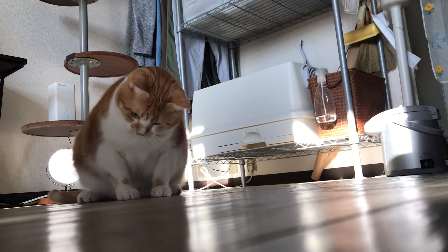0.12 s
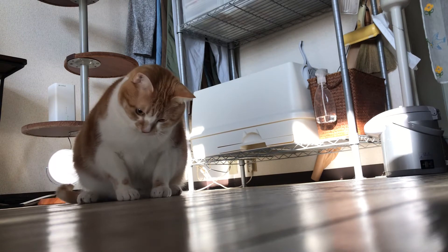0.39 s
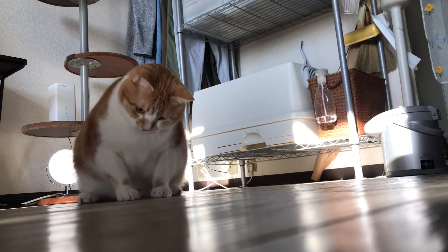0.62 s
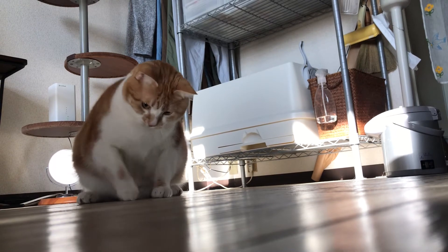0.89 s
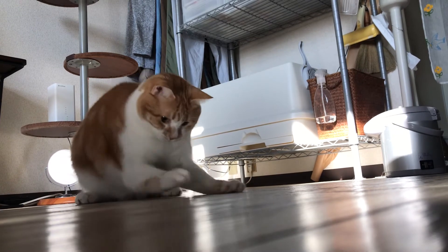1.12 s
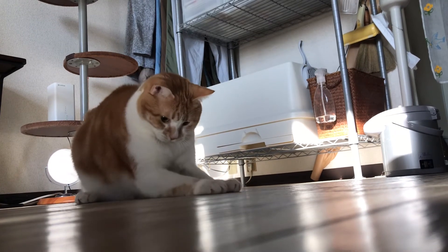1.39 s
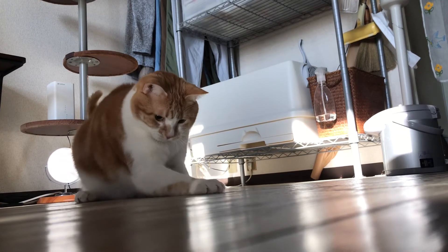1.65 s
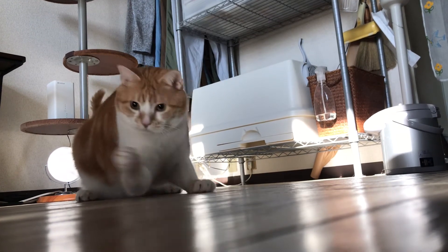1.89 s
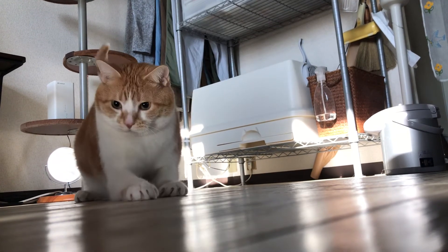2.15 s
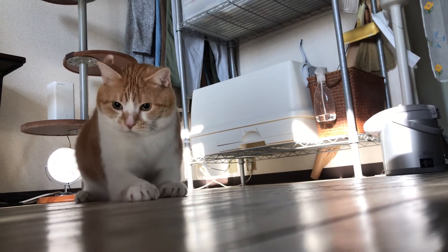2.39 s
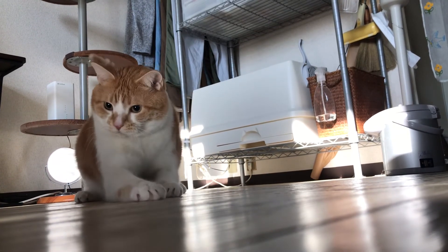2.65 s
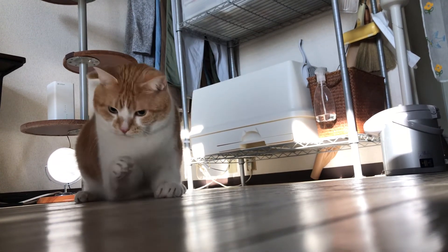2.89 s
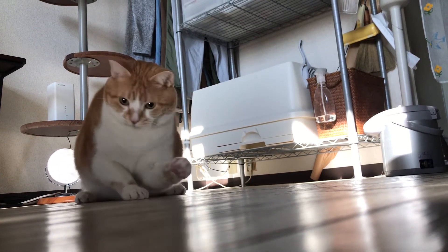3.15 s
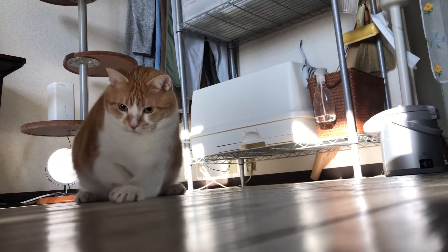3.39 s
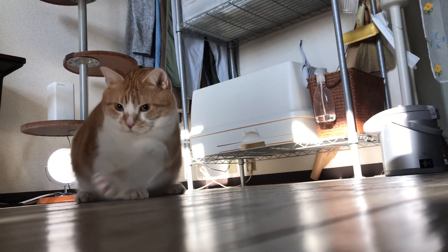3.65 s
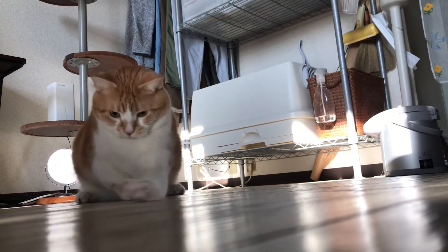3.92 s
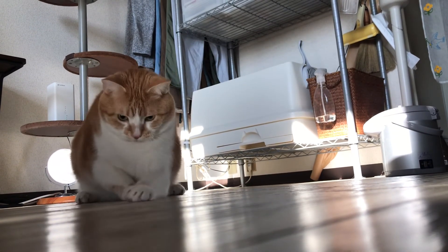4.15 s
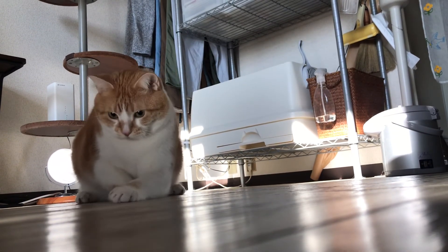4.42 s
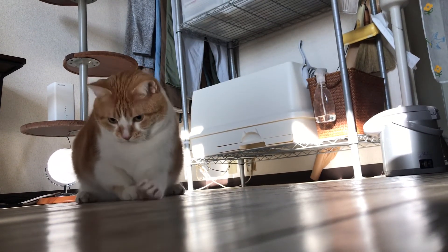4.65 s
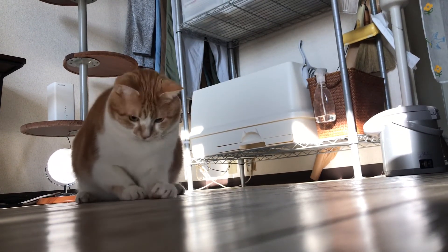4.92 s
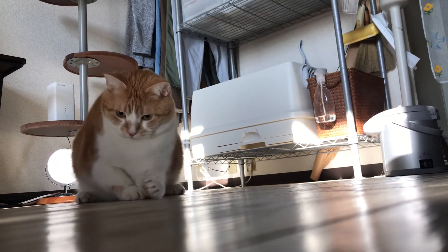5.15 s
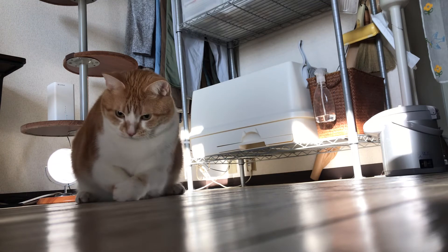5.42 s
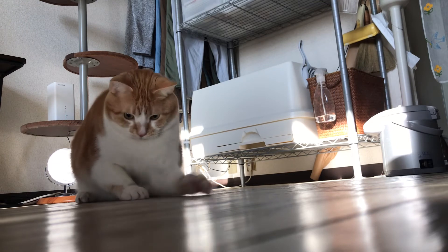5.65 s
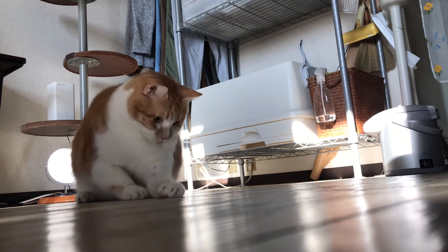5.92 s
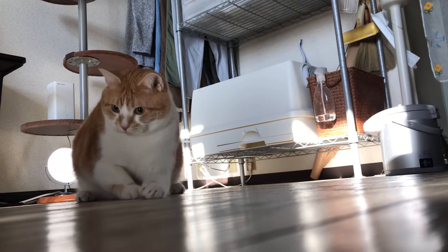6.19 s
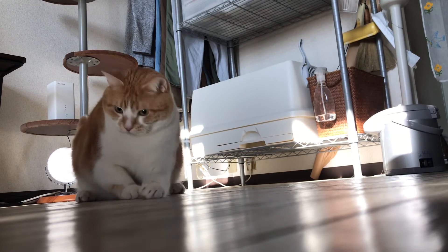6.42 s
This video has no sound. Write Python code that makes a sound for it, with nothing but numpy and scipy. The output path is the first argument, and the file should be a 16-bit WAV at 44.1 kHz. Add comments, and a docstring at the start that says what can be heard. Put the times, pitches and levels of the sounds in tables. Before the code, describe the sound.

A microphone on the floorboards of a small furnished room picks up a cat's paws. At first there is only low muffled traffic, wavering deep hum and faint hiss, with a tiny wet throat pop and fluttering purr breath near 0.45 s. A slight scuff at 0.8 s leads to a cluster of soft, dull thumps with claw ticks at 1.0-1.15 s. Stronger hollow knocks follow at 1.57, 1.99 and 2.56 s, the last sharp and clicky with a boomy ring. Faint purring with small pops comes around 2.2 and 2.9 s, and weak pats near 3.0 and 3.25 s. A solid thump with a claw click and scuff lands at 3.9 s. Quiet purring runs 4.25-4.85 s, ending with a barely audible pat. A softer thud comes at 5.65 s, then a last faint purr from 5.8 s and a throat pop with a brief low swell near 6.27 s, as hum and rumble rise slightly until 6.5 s.

```python
"""Cat pouncing on a wooden floor

A cat pats and pounces on floorboards, the microphone lying on the same boards. Each paw excites
a bending pulse and the ringing low modes; claws tick in short resonant bursts and pads scuff by friction.
The cat purrs on its breaths, airflow noise chopped into puffs, and wet pops come from its throat.
Traffic noise and wavering hums come through the walls, with a faint whine and microphone hiss."""
import sys
import numpy as np
from scipy import signal
from scipy.fft import rfft, irfft
from scipy.io import wavfile
from scipy.ndimage import uniform_filter1d

SR = 44100
rng = np.random.default_rng(int(sys.argv[2]) if len(sys.argv) > 2 else 0)


def how_loud(loudness_db):
    """Turn decibels into a plain amplitude multiplier (0 dB gives 1, 20 dB gives 10)."""
    steps = np.asarray(loudness_db, float) / 20
    return 10 ** steps


def persist_wave(psi):
    """Save psi, clipped to +-1, as 16-bit WAV."""
    counts = np.round(np.clip(psi, -1, 1) * 32767).astype(np.int16)
    wavfile.write(sys.argv[1], SR, np.atleast_2d(counts).T)


N = 288783

# paw blows: start_s, peak_db (before the joist filter), contact_ms, tuning_factor, ring_db (re first pulse)
PAW_BLOWS = [(0.994, -32, 5.3, 1.08, 11), (1.094, -29, 7.6, 1.2, -6.5), (1.151, -23.5, 5.8, 1., -1.5),
             (1.5699, -15, 3.23, 0.98, -2.5), (1.6403, -27.5, 1.7, 0.94, -5.5),
             (1.9854, -13.5, 1.4, 0.88, -7), (2.519, -34, 0.59, 1.88, -12), (2.561, -13.5, 0.4, 1.013, -6),
             (2.578, -27, 1.4, 1.002, 23), (3.003, -36.5, 20, 0.89, 15), (3.245, -45, 0.93, 1.05, -3),
             (3.9206, -19, 3.1, 0.92, -1.5), (4.834, -46.5, 0.89, 1.34, -10),
             (5.669, -24.5, 6.6, 0.95, -3.5)]
# modes of the floorboards: mode_hz, level_db, t60_s (before the cat's weight damps them)
BOARD_MODES = [(63.45, -48, 0.46), (69.85, -5.5, 0.36), (81.7, -7, 0.63), (102.9, -8.5, 0.23),
               (118.1, -17.5, 0.6), (140.7, -15, 0.55), (193.3, -23, 0.73), (234.8, -16, 0.42),
               (290, -8.5, 0.077), (321, -28.5, 0.39), (401.6, -16.5, 0.15), (477, -30.5, 0.34),
               (518, -47, 0.3), (707.7, -26, 0.088)]
# claw ticks: start_s, peak_db, centre_hz, width_share (of the centre, each resonance pass)
CLAW_TICKS = [(0.8374, -52.5, 2530, 1.1), (0.9187, -48, 2960, 0.36), (0.9839, -33, 2680, 0.7),
              (1.0812, -32, 3100, 2.1), (1.1495, -30, 2160, 0.87), (1.1608, -27.5, 2850, 0.45),
              (1.5662, -34, 2540, 0.69), (1.5722, -31.5, 2900, 1.6), (1.7523, -48.5, 7000, 2.3),
              (1.8018, -53, 2980, 1.2), (1.8807, -49, 1970, 1.8), (1.982, -37, 2800, 0.76),
              (1.9935, -24.5, 3070, 0.46), (2.0697, -43, 2400, 1), (2.556, -23, 2400, 1.33),
              (2.5678, -35, 2140, 0.65), (2.577, -31.5, 3690, 1.1), (3.242, -44.5, 3930, 0.43),
              (3.3244, -51, 2900, 0.76), (3.679, -46.5, 3000, 1.3), (3.9087, -24, 2500, 1.9),
              (3.9402, -37, 3200, 3.2), (4.8379, -48.5, 2260, 0.46), (5.6434, -45, 2705, 1.2),
              (5.6487, -29.5, 2460, 1.25), (5.6598, -48, 3200, 0.94)]
# pads sliding on the varnish: start_s, held_rms_db, slide_s, fade_t60_s, tilt_db_per_octave
PAD_SLIDES = [(0.828, -61.5, 0.011, 0.041, -8), (.992, -52.5, 0.033, 0.03, 1.5),
              (1.091, -56.5, 0.037, 0.065, 1), (1.14, -45.5, 0.037, 0.13, 4), (1.570, -40, 0.01, 0.025, -6),
              (1.63, -52, 0.0096, 0.03, -6), (1.794, -64.5, 0.029, .05, -4), (1.88, -52.5, 0.027, 0.09, -8),
              (1.993, -38.5, 0.028, 0.078, 2), (2.061, -66, 0.061, 0.035, 5),
              (2.5174, -53.5, 0.0042, 0.2, -5), (2.557, -50, 0.0025, 0.056, -1),
              (2.574, -50, 0.006, 0.035, 2.5), (2.67, -66, 0.0145, 0.024, -2.5),
              (2.70, -66, 0.015, .03, -5), (3.239, -52, 0.022, 0.1, -0.5), (3.384, -58.5, 0.043, 0.09, 2.5),
              (3.557, -69, 0.028, .05, -2), (3.691, -54, 0.013, 0.071, 3), (3.909, -51, 0.03, 0.091, -0.5),
              (4.07, -69, 0.017, 0.036, 0), (4.837, -62.5, 0.03, 0.096, -0.5), (5.25, -63, .034, 0.22, 3.5),
              (5.648, -49, 0.012, 0.12, -2)]
# friction spectrum before the tilt: frequency_hz, density_db (per Hz, relative)
FRICTION_SPECTRUM = [(290, -45.5), (600, -11.5), (1300, -10.5), (2500, -2), (3700, -3.5), (4800, -19.5),
                     (5630, -8.5), (7640, -23.5), (10400, -30.5), (14000, -25), (16000, -35)]
# purring breaths: first_puff_s, end_s, level_db, change_db (by the end), throb_share
PURR_BREATHS = [(.446, 0.687, -68.5, -2.5, 0.84), (1.486, 1.57, -75.5, 20, 0.26),
                (2.173, 2.47, -65.5, -1, 0.75), (2.913, 3.133, -61.5, -6.5, 0.36),
                (4.246, 4.84, -65, -5, 0.67), (5.8, 6.17, -71, 2, 0.3)]
# airway resonances: centre_hz, width_hz, level_db
NOSE_MODES = [(1118, 270, -1), (2820, 670, -6), (3510, 700, 0), (3830, 94, -17)]
# hiss of fast air in the nostrils: centre_hz, width_hz, level_db
NOSTRIL_MODES = [(5960, 610, -5.5), (6900, 1920, -11), (8520, 1400, -14)]
# wet pops in the cat's throat: start_s, peak_db, centre_hz
THROAT_POPS = [(0.435, -52, 1140), (0.466, -55, 1230), (1.461, -53.5, 1100), (2.163, -56, 1050),
               (2.298, -46, 1070), (2.398, -52, 972), (2.899, -49.5, 1134), (2.953, -48, 1220),
               (3.014, -55, 1200), (3.084, -53, 1140), (3.744, -50, 870), (6.26, -48.5, 756)]
# traffic beyond the wall: time_s, rumble_db (before drift), roar_rms_db (tyres, near 1 kHz)
TRAFFIC_LEVELS = [(0, -60, -82), (.8, -59, -74), (1.4, -58, -76), (2.3, -56, -72.5), (3, -59, -76.5),
                  (4, -60, -79.5), (4.5, -56, -67.5), (5.2, -62, -70), (5.6, -56, -71), (6.001, -56, -66),
                  (6.3, -52, -72.5), (6.55, -54.5, -65)]
# rumble spectrum: frequency_hz, density_db (per Hz, relative)
RUMBLE_SPECTRUM = [(20, -28), (40, -12.5), (70, -3), (150, -4), (250, -11), (350, -15), (480, -24.5),
                   (700, -52), (1000, -89)]
# one brief soft low swell: rms_db (at its height), centre_hz, width_hz
LOW_SWELL = (-51.5, 246, 340)
# low hum: time_s, pitch_hz, rms_db
LOW_HUM_TRACK = [(0, 48, -54.5), (.6, 46.9, -59.5), (.75, 53.8, -55.5), (1.4, 57, -57.5), (2.7, 58, -53),
                 (3.8, 51.2, -56), (4.3, 53.08, -53.5), (4.7, 54, -50.5), (5.1, 54.8, -48.5),
                 (5.6, 55.5, -54.5), (5.8, 56.8, -47.5), (6.55, 57.3, -47.5)]
# a higher hum that comes twice: time_s, pitch_hz, rms_db
HIGH_HUM_TRACK = [(2.9, 148, -76), (3.2, 148, -60), (3.8, 147.5, -55), (3.9, 146, -88), (5.8, 148.2, -68.5),
                  (6.05, 148.6, -67.5), (6.3, 147.5, -52), (6.55, 146, -55)]
# faint high whine: time_s, pitch_hz, rms_db
WHINE_TRACK = [(0, 12700, -91), (4.3, 13100, -87), (4.7, 13000, -104), (6.55, 13000, -90)]
# microphone hiss: frequency_hz, density_db (per Hz, relative)
HISS_SPECTRUM = [(290, -10), (500, -3.5), (709, -3), (1230, -1), (1650, -5.5), (3890, -9.5), (4770, -15),
                 (5850, -13.5), (9180, -16.5), (10500, -20), (13000, -15.5), (15300, -18.5), (16200, -28.5)]

DAMPING = 0.71  # the cat's weight shortens the ring of the boards to this share
TRAVEL_MS = 8.52  # delay of a 71 Hz mode; lower modes arrive later
RISE_SHARE = 0.16  # the pad presses down over this share of the slide
PUFFS_PER_S, NOSTRIL_DB = 29.8, 1  # nostril level at the start of a breath
SWELL_S, SWELL_HALF_S = 6.27, 0.065  # centre, and distance from it to 1/e of the height
CLEAR_DB, SMEAR_PER_DB = -48, 0.13  # a hum is pure from this level up; noise share gained per dB below
HISS_DB = -69


def evened(x):
    """Normalisation: scales a signal to rms 1."""
    return x / np.sqrt(np.mean(x ** 2) + 1e-20)


def add(mix, s, sound):
    """Superposition: adds a sound into the mix at s seconds."""
    part = mix[round(s * SR):][:len(sound)]
    part += sound[:len(part)]


def coloured(points, tilt_db=0., size=N):
    """Spectral shaping: white noise weighted by a spectrum, tilted about 3 kHz in dB an octave."""
    hz = np.fft.rfftfreq(size, 1 / SR) + 1
    f, db = np.transpose(points)
    shape_db = np.interp(np.log(hz), np.log(f), db) + tilt_db * np.log2(hz / 3000)
    white = rng.standard_normal(size)
    return evened(irfft(rfft(white) * how_loud(shape_db), size))


def resonate(x, hz, width):
    """Resonance: heterodynes to zero, smooths and shifts back, with gain 1 on a fixed or moving pitch."""
    turn = np.exp(2j * np.pi * np.cumsum(hz * np.ones(len(x))) / SR)
    r = np.exp(-np.pi * width / SR)
    return 2 * (turn * signal.lfilter([1 - r], [1, -r], x / turn)).real


def resonate_twice(x, hz, width):
    """Cascaded resonance: a second pass steepens the skirts of the first."""
    return resonate(resonate(x, hz, width), hz, width)


def noise_band(hz, width):
    """Band noise: white noise through a cascaded resonance, at rms 1."""
    return evened(resonate_twice(rng.standard_normal(N), hz, width))


def slow(rate):
    """Random modulation: noise averaged twice over 1/rate seconds drifts slowly, at rms 1."""
    size = max(int(SR / rate), 1)
    return evened(uniform_filter1d(uniform_filter1d(rng.standard_normal(N), size), size))


def clicks(rows, burst_s, lag_s, snap_db):
    """Impulsive excitation: a burst of a few ms rings one resonance, opened by a thin treble snap."""
    out, t = np.zeros(N), np.arange(1200) / SR
    # dispersion: low notes trail, by lag_s at 1 kHz
    spread = np.exp(-4j * np.pi * lag_s * np.sqrt(1000 * np.fft.rfftfreq(len(t), 1 / SR)))
    for s, db, hz, share in rows:
        decay = how_loud(-60 * t / burst_s)
        burst = rng.standard_normal(len(t)) * decay
        width = np.clip(share, 0.05, 3) * hz
        click = irfft(rfft(resonate_twice(burst, hz, width)) * spread, len(t))
        snap = np.diff(burst * decay, 2)
        add(out, s, how_loud(db) * click / abs(click).max())
        snap_peak = how_loud(db + snap_db) * share ** 2  # wider clicks snap harder
        add(out, s, snap_peak * snap / abs(snap).max())
    return out


def thumps():
    """Modal excitation: a dispersed bending pulse leaves the board modes ringing; longer contact is duller."""
    out, t = np.zeros(N), np.arange(SR // 2) / SR
    for s, db, contact_ms, tuning, ring_db in PAW_BLOWS:
        near = (t - 0.00446 / tuning) * tuning
        chirp = np.cos(2 * np.pi * (185 - 4000 * near) * near)  # treble arrives first
        wave = -np.exp(-(near / 0.0036) ** 2) * chirp
        for hz, mode_db, t60 in BOARD_MODES:
            late = np.maximum(t - TRAVEL_MS / 1000 * np.sqrt(71 / hz), 0)
            ring = how_loud(ring_db + mode_db - 60 * late / (t60 * DAMPING))
            wave += ring * np.sin(2 * np.pi * hz * tuning * late)
        dense = evened(resonate(rng.standard_normal(len(t)), 280, 490))  # many small modes of the planks
        wave += how_loud(-32.5 - 60 * t / 0.27) * np.minimum(t / 0.0019, 1) * dense
        push = np.hanning(max(round(contact_ms * SR / 1000), 3))
        blow = signal.fftconvolve(wave, push)
        add(out, s, how_loud(db) * blow / abs(blow).max())
    joists = signal.butter(6, 56, "high", fs=SR, output="sos")  # stiff joists hold the lowest motion
    return signal.sosfilt(joists, out)


def claw_ticks():
    """Dispersive propagation: claw bursts on the varnish cross the boards, their low notes trailing."""
    return clicks(CLAW_TICKS, burst_s=0.011, lag_s=0.0014, snap_db=-29)


def scuffs():
    """Friction noise: swells, holds while the pad slides, and fades; the grip stutters in clumps of grains."""
    out, t = np.zeros(N), np.arange(16384) / SR
    for s, db, slide, t60, tilt_db in PAD_SLIDES:
        rise = np.minimum(t / (RISE_SHARE * slide), 1)
        fade = how_loud(-60 * np.maximum(t - slide, 0) / t60)
        add(out, s, how_loud(db) * rise * fade * coloured(FRICTION_SPECTRUM, tilt_db, size=len(t)))
    grip = how_loud(3.1 * slow(1200) + 2.1 * slow(330))
    return out * evened(grip)


def airway(air, modes):
    """Formant filtering: turbulent air excites parallel airway resonances whose levels flicker."""
    out = np.zeros(N)
    for hz, width, db in modes:
        # two passes of 1.5 widths leave about one width
        out += how_loud(db + 2.2 * slow(53)) * resonate_twice(air, hz, 1.5 * width)
    return out


def purr():
    """Modulated turbulence: airflow noise is chopped each time the larynx shuts; hiss dies as breath slows."""
    air, t, out = rng.standard_normal(N), np.arange(N) / SR, np.zeros(N)
    nose, nostrils = airway(air, NOSE_MODES), airway(air, NOSTRIL_MODES)
    uneven = 0.035 * slow(25)  # in puff cycles
    for s, end, db, change_db, share in PURR_BREATHS:
        done = np.clip((t - s) / (end - s), 0, 1)
        cycle = PUFFS_PER_S * (t - s) + uneven
        puffs = (0.5 + 0.5 * np.cos(2 * np.pi * cycle)) ** 1.9
        edges = np.clip(np.minimum((t - s + 0.014) / 0.0084, (end - t) / 0.059), 0, 1)
        flow = how_loud(db + change_db * done) * edges * (1 - share + 2 * share * puffs)
        out += flow * (nose + how_loud(NOSTRIL_DB - 9.8 * done) * nostrils)
    return out / nose.std() * how_loud(1.2 * slow(70))


def throat_pops():
    """Damped resonance: each wet pop in the throat is a short burst around one pitch, without dispersion."""
    rows = [(*pop, 0.33) for pop in THROAT_POPS]  # width as a share of the centre
    return clicks(rows, burst_s=0.0097, lag_s=0, snap_db=-30)


def room(x, t60):
    """Reverberation: sparse taps of random sign, dying quickly as in a small furnished room."""
    at = np.arange(120, 12000, 20) + rng.integers(0, 20, 594)
    taps = np.zeros(12100)
    taps[at] = rng.choice([-1., 1.], len(at)) * how_loud(-60 * at / SR / t60)
    return signal.fftconvolve(x, taps / np.linalg.norm(taps))[:N]


def traffic():
    """Broadband noise: drifting low rumble, a band of tyre roar of changing level, and one short swell."""
    s, rumble_db, roar_db = np.transpose(TRAFFIC_LEVELS)
    t = np.arange(N) / SR
    rumble = how_loud(np.interp(t, s, rumble_db) + 2.06 * slow(6.5)) * coloured(RUMBLE_SPECTRUM)
    roar = how_loud(np.interp(t, s, roar_db)) * noise_band(1010, 900)
    db, hz, width = LOW_SWELL
    bump = np.exp(-((t - SWELL_S) / SWELL_HALF_S) ** 2)
    return rumble + roar + how_loud(db) * bump * noise_band(hz, width)


def hum(rows, width, clear_db):
    """Partial coherence: a wavering tone gives way to a narrow band of noise as it weakens."""
    s, *columns = np.transpose(rows)
    hz, db = (np.interp(np.arange(N) / SR, s, c) for c in columns)
    fuzz = np.clip((clear_db - db) * SMEAR_PER_DB, 0, 1)  # share of the power that is noise
    tone = np.sqrt(2) * np.sin(2 * np.pi * np.cumsum(hz) / SR)
    return how_loud(db) * (np.sqrt(1 - fuzz) * tone + np.sqrt(fuzz) * noise_band(hz, width))


def hums():
    """Tonal background: two low hums and a faint whine, each following its own pitch and level."""
    low = hum(LOW_HUM_TRACK, 13.6, CLEAR_DB)
    high = hum(HIGH_HUM_TRACK, 5.5, CLEAR_DB - 6)
    return low + high + hum(WHINE_TRACK, 540, CLEAR_DB)


def hiss():
    """Self-noise: the microphone adds steady coloured noise."""
    return how_loud(HISS_DB) * coloured(HISS_SPECTRUM)


def scene():
    """Superposition: thumps in the boards, airborne sounds with their reverberation, and the background."""
    airborne = claw_ticks() + throat_pops() + scuffs() + purr()
    reverberation = how_loud(-8.0) * room(airborne, 0.13)
    background = traffic() + hums() + hiss()
    return (thumps() + airborne + reverberation + background)[None]


def top_cut(x):
    """Nothing passes above the cut-off."""
    return signal.sosfilt(signal.butter(12, 16600, fs=SR, output="sos"), x)


def record(dry):
    """Band limiting: the microphone loses the deepest bass; a steep filter ends the treble near 17 kHz."""
    bass_cut = signal.butter(2, 30, "high", fs=SR, output="sos")
    treble_cut = signal.cheby2(10, 50, 17100, fs=SR, output="sos")
    thin = signal.sosfilt(bass_cut, dry)
    thin = signal.sosfiltfilt(treble_cut, thin)
    return top_cut(thin)


dry = scene()
out = record(dry)
persist_wave(out)
```